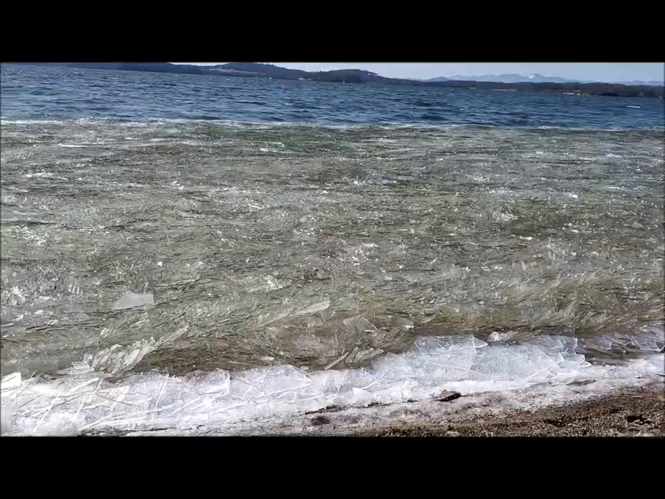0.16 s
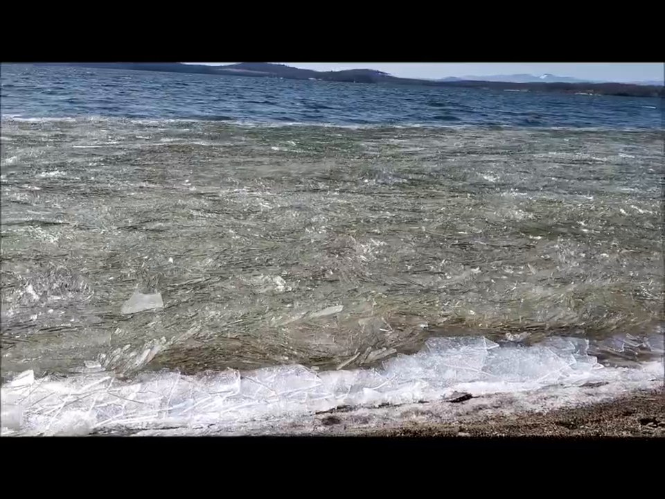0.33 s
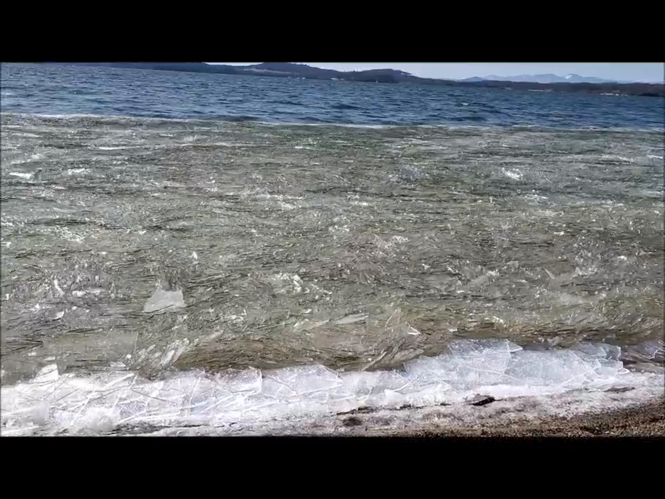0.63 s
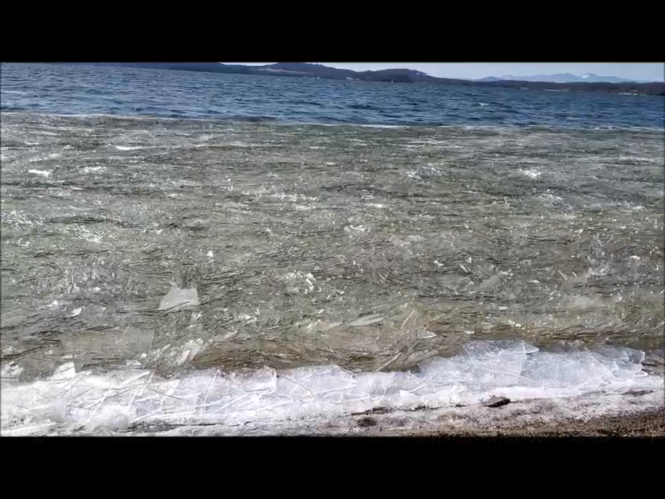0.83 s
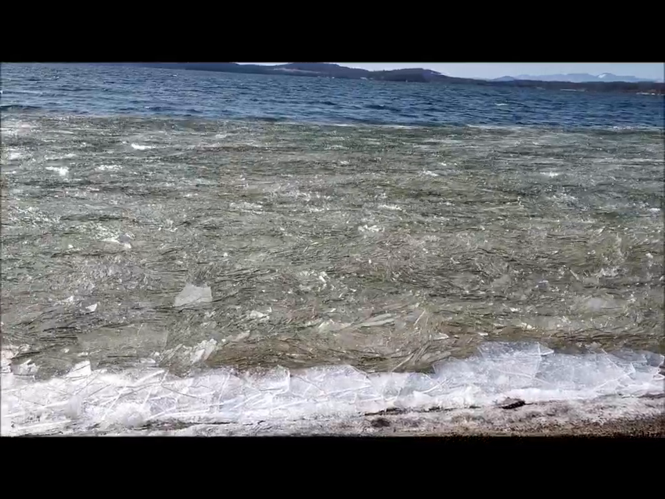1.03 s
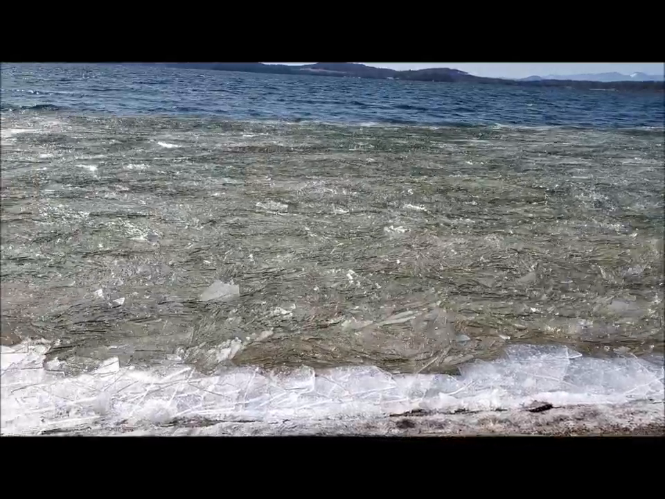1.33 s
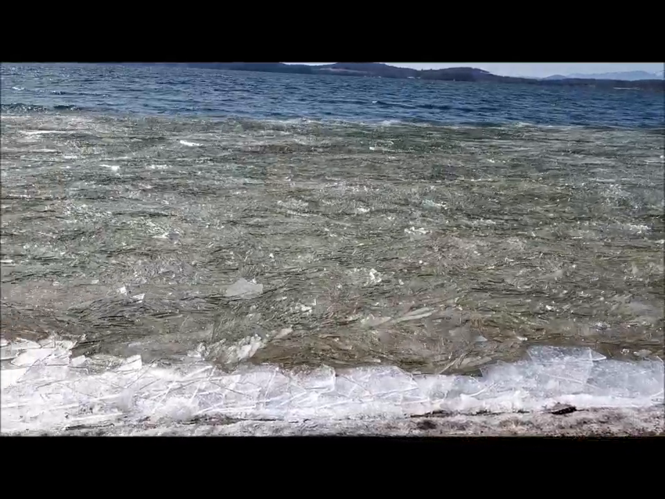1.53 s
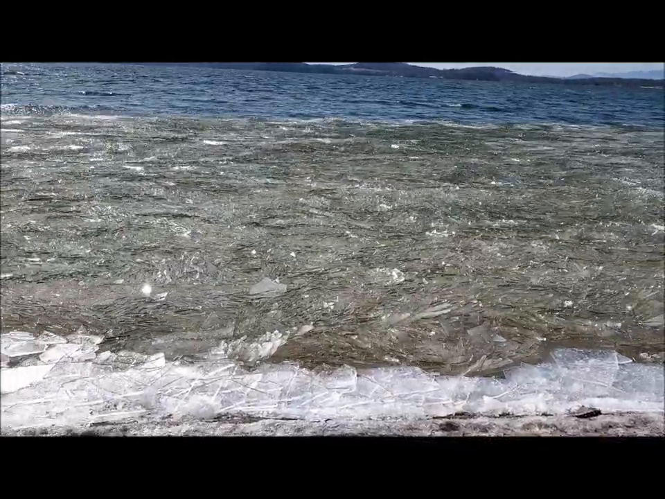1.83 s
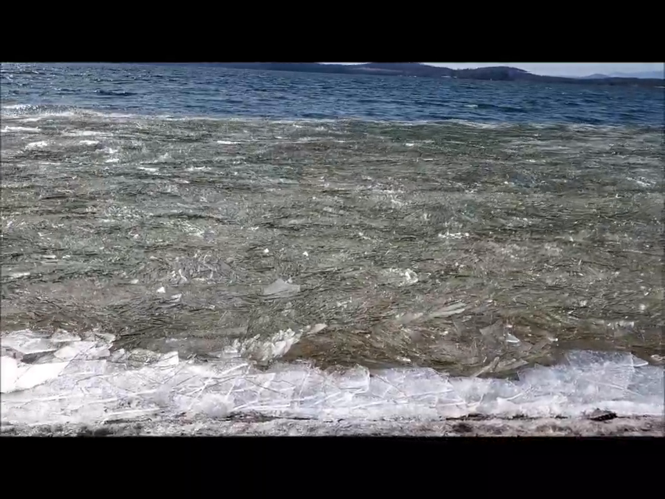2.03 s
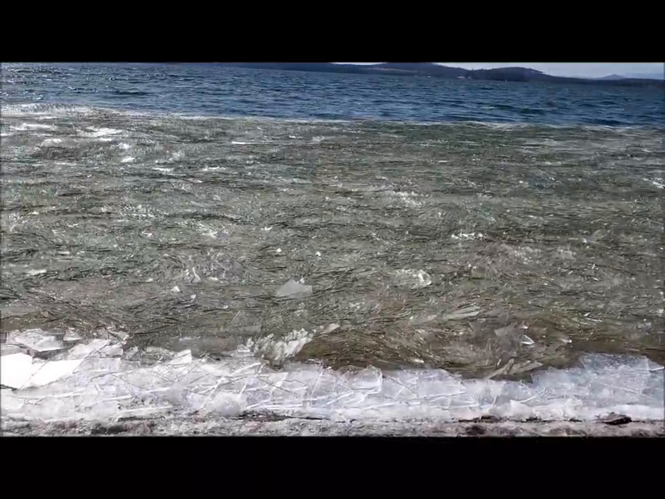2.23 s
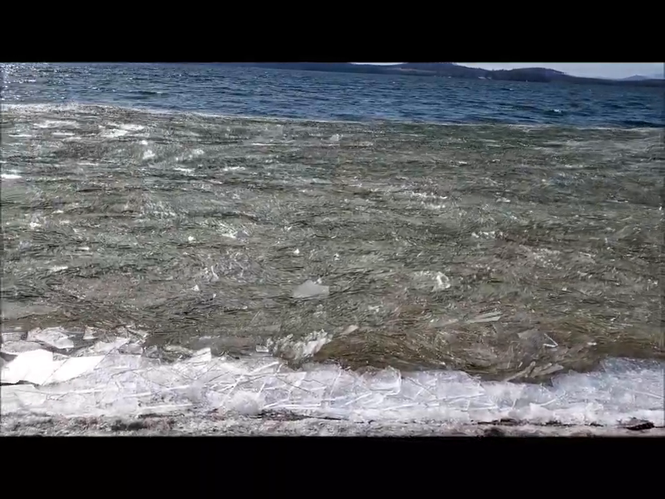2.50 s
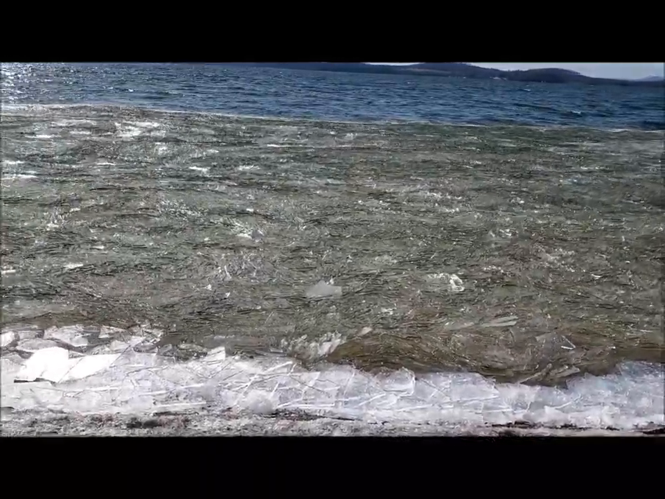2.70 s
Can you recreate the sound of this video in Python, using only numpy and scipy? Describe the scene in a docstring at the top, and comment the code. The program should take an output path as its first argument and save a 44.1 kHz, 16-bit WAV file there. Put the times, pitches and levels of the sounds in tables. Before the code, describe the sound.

Dense clinking and rattling of thin ice plates in small lake waves, with wash and light fizz; strong at first, dipping mid-way, then partly returning, as low wind thumps two spaced outdoor microphones.

```python
"""Small waves rock a field of thin broken ice plates along a lake shore, heard at two spaced microphones.
At first the water and ice are strong and busiest on the left; they sink after a second, then partly return
while the busy side moves to the right. Plates ring as short resonances, single knocks stand clear of them,
and water washes and fizzes as banded noise. Wind flutters low on each microphone, thumping from a third of
a second on: sparse clicks and noise coloured low, and brief bass swings at unequal levels on the two."""
import sys
import numpy as np
from scipy import signal
from scipy.fft import rfft, irfft
from scipy.io import wavfile
from scipy.ndimage import uniform_filter1d

SR = 44100
rng = np.random.default_rng(int(sys.argv[2]) if len(sys.argv) > 2 else 0)


def generate_wav(signal):
    """Clip the signal to [-1, 1] and save it as 16-bit WAV at the path in sys.argv[1]."""
    frames = np.transpose(np.atleast_2d(signal))
    scaled = np.clip(frames, -1, 1) * 32767
    pcm = np.round(scaled).astype(np.int16)
    wavfile.write(sys.argv[1], SR, pcm)


N = 126126

SPACING_S = 0.0004134   # sound's travel time from one microphone to the other
ALONG_SHORE = 0.8   # exponent; below 1, sources crowd toward the two ends of the shore

# relative colour shared by water and ice: pitch_hz [Hz], density_db [dB per Hz]
LAKE_COLOUR = [(200, -23), (300, -16), (420, -14), (560, -9), (900, -11), (1500, -10.5), (2350, -14.5),
               (2800, -20.5), (3600, -18), (4500, -25), (5600, -34.5), (7400, -38.5), (8100, -39),
               (9000, -32), (10500, -34), (12500, -36.5), (15700, -40)]


def clinking(levels, right):
    """Plates of all sizes touch at random, in clumps; each ring reaches the nearer microphone first."""
    clinks_per_s, size_spread_db, level_db = 1500, 0.5, -1.9   # level relative to the low surge
    clump_db, clumps_per_s = 2, 8.3   # wander of the clink rate
    rattle_db, rattles_per_s = 1.5, 11   # each plate pitch has its own busy spells
    ring_cycles, ring_law = 20.2, 0.37   # cycles per 60 dB of decay at 1 kHz; ring time falls as pitch^law
    shadow_db, tick_db = 1, -3.5   # far ear softer; dry crack of each touch against its ring
    margin = 32   # samples of room for the earlier arrivals

    rate = clinks_per_s * from_db(clump_db * drift(clumps_per_s))
    clicks = sparse(rate, size_spread_db, channels=1)[0]
    toward_end = np.sin(np.pi / 2 * rng.random(N)) ** ALONG_SHORE
    side = toward_end * np.where(rng.random(N) < right, 1, -1)   # -1 left to 1 right

    pitches = np.geomspace(330, 5200, 40)
    plate = rng.choice(40, N, p=pitches / pitches.sum())   # high pitches are struck more often
    rings, ticks = np.zeros((2, 2, N + 2 * margin))
    for k, hz in enumerate(pitches):
        at = np.nonzero(clicks * (plate == k))[0]
        delay = np.round(side[at] * SPACING_S * SR).astype(int)
        pair = np.full(rings.shape, 1e-18)
        pair[0, at + margin + delay] = clicks[at] * from_db(-shadow_db * side[at] / 2)
        pair[1, at + margin] = clicks[at] * from_db(shadow_db * side[at] / 2)
        ticks += pair

        # two equal resonators in a row soften the start of the ring
        decay_db_per_s = 60 * 1000 * (hz / 1000) ** ring_law / ring_cycles
        r = from_db(-decay_db_per_s / SR)
        turn = 2 * np.pi * hz / SR
        for _ in range(2):
            pair = signal.lfilter([1], [1, -2 * r * np.cos(turn), r * r], pair)
        swell = from_db(surge_db(hz, levels) + rattle_db * drift(rattles_per_s))
        rings[:, :N] += rms_one(pair[:, :N]) * np.sqrt(hz) * swell

    tick_gain = from_db(tick_db + levels[2] - levels[2].mean())
    both = rms_one(rings[:, :N]) + rms_one(ticks[:, :N]) * tick_gain
    return from_db(level_db + levels[0].mean()) * rms_one(colour(both, LAKE_COLOUR))


def knocks():
    """A plate is struck: a rough ring that holds for its length and dies fast in the water."""
    # clearest clinks: start_s [s], pitch_hz [Hz], level_db [dB, main mode before its envelope],
    # length_ms [ms to half amplitude], side [about -1 left to 1 right, by delay alone]
    strikes = [(0.008, 535, -38, 5.1, 0), (0.024, 580, -33.5, 33, -0.77), (0.03, 1712, -32.5, 12, -0.038),
               (0.037, 732, -26.5, 12.4, -1), (0.081, 552, -34.5, 13, -0.17), (0.082, 180, -33.5, 17, 0),
               (0.267, 1490, -29, 8.4, -0.92), (0.307, 690, -23.5, 2.4, -1.35), (0.469, 383, -33, 15, 0.71),
               (0.48, 3810, -35, 1.9, -0.47), (0.669, 910, -29.5, 6.5, 0), (0.688, 1635, -37, 15, 0),
               (0.708, 564, -32, 6, 0), (0.709, 1120, -32, 10.3, -0.16), (0.734, 4350, -35, 5.7, 0.55),
               (0.774, 2440, -29.5, 2.9, 0.0), (0.833, 507, -33.5, 12, -0.28), (0.915, 943, -34, 8.5, 0),
               (0.949, 2670, -20.5, 1.6, 1.07), (0.952, 1560, -32, 6.7, -1.06),
               (1.029, 3640, -29.5, 1.9, -0.65), (1.037, 2046, -25, 9.4, 0.82), (1.053, 777, -36, 7.9, 0),
               (1.051, 2190, -32, 5, 1.0), (1.374, 460, -34.5, 8.5, -0.9), (1.376, 780, -36, 4.9, -0.12),
               (1.472, 2200, -35, 7.2, 0.79), (1.598, 2400, -36, 5.6, 0.7), (1.964, 2360, -41, 20, -0.14),
               (2.002, 620, -30, 3.5, -0.84), (2.04, 2400, -35.5, 6.1, 1.02),
               (2.216, 870, -25.5, 5.7, -0.1), (2.218, 1396, -37, 5, -0.1), (2.312, 3230, -39.5, 5, -0.7),
               (2.325, 730, -33.5, 4.8, 0.2), (2.338, 2400, -35, 12, 1.02), (2.367, 1220, -38, 9.3, 0.66),
               (2.456, 2010, -36.5, 9.8, 0.94), (2.782, 1150, -34, 5.2, 1.13),
               (2.796, 2450, -38.5, 7, 1.03)]
    attack_s, roughness = 0.00065, 0.28
    partner_ratio, partner_db = 1.14, -12   # a weaker mode rings just above the main one

    out = np.zeros((2, N + SR))
    t = np.arange(SR // 10) / SR
    noises = rng.standard_normal((len(strikes), len(t)))
    for (start_s, hz, level_db, length_ms, side), noise in zip(strikes, noises):
        attack = 1 - np.exp(-(t / attack_s) ** 2)
        hold = np.exp(-np.log(2) * (1000 * t / length_ms) ** 3)
        around = signal.butter(3, [hz / 1.26, hz * 1.23], "band", fs=SR, output="sos")
        rough = rms_one(signal.sosfilt(around, noise))
        partner = from_db(partner_db) * np.sin(2 * np.pi * partner_ratio * hz * t)
        tone = np.sin(2 * np.pi * hz * t) + partner
        ring = attack * hold * (tone + roughness * rough)
        for channel, lag in enumerate([side, -side]):
            i = max(int((start_s + lag * SPACING_S / 2) * SR), 0)
            out[channel, i:i + len(t)] += from_db(level_db) * ring
    return out[:, :N]


def wash(levels, right):
    """Water noise in bands, each swelling with the surge and flickering in patches; the fizz is steadier."""
    level_db, fizz_db, fizz_from_hz = 0, 6.5, 5000   # level relative to the low surge; lift of the fizz
    shared_db, own_db, patches_per_s = 0.5, 1.42, 12.4   # flicker of all bands together and of each alone
    fizz_flicker = 0.67   # share of the flicker that the fizz keeps

    out, together = 0, drift(patches_per_s)
    edges = np.geomspace(120, 19000, 25)
    fields = [all_round(right, count=12), all_round(right, count=12)]   # neighbouring bands alternate
    for k, (low, high) in enumerate(zip(edges, edges[1:])):
        hz = np.sqrt(low * high)
        band_pass = signal.butter(2, [low, high], "band", fs=SR, output="sos")
        band = signal.sosfilt(band_pass, fields[k % 2])
        patch_db = shared_db * together + own_db * drift(patches_per_s)
        if hz >= fizz_from_hz:
            patch_db = patch_db * fizz_flicker
        lift_db = fizz_db * (hz > fizz_from_hz)
        out = out + band * from_db(surge_db(hz, levels) + patch_db + lift_db)
    return from_db(level_db + levels[0].mean()) * rms_one(colour(out, LAKE_COLOUR))


def wind():
    """Eddies flutter on each microphone separately; harder thumps push both at unequal levels."""
    # gust curve: time_s [s], level_db [dB before the trim], left_minus_right_db [dB]
    gusts = [(0.0, -27.5, 0), (0.04, -40, 0.5), (0.13, -39, 0), (0.21, -41.5, -19), (0.29, -41.5, 2),
             (0.33, -37.5, -5), (0.37, -45.5, -9), (0.44, -30.5, 0), (0.5, -43, -6), (0.64, -41, -2),
             (0.69, -44.5, 0.5), (0.92, -40.5, 0.5), (1.01, -50, 4), (1.11, -38, 5), (1.15, -45, 2),
             (1.2, -44, 5), (1.27, -38.5, -6), (1.31, -47.5, 4), (1.43, -50, 20), (1.47, -47, 6),
             (1.74, -39, -3.5), (1.87, -50.5, 0), (2.06, -34, 2), (2.2, -51, -2), (2.26, -42.5, 26),
             (2.35, -39.5, 2), (2.71, -36, 1), (2.74, -41, 16), (2.8, -35, -3), (2.86, -41.5, 5)]
    # relative colour of the buffeting: pitch_hz [Hz], density_db [dB per Hz]
    buffet = [(20, -29.5), (35, -19.5), (55, -11), (75, -11), (110, -15), (150, -21.5), (220, -27.5),
              (400, -35.5), (800, -90)]
    # hardest thumps: centre_s [s], peak_db [dB before panning], left_minus_right_db [dB]
    thumps = [(0.323, -30, 4), (0.441, -39, -2), (0.642, -31.5, -11), (0.9, -33.5, 15), (1.11, -35, -4),
              (1.631, -32, 0), (2.052, -28, -5), (2.121, -28, -5), (2.5, -37, 1), (2.6, -29, -2),
              (2.718, -43, 22), (2.81, -26, 22)]
    trim_db, eddies_per_s, eddy_spread_db, eddy_share = -0.4, 64, 2.5, 0.58   # the rest is steady noise
    lull_db, lulls_per_s = 2.5, 14   # wander of the level at each microphone
    thump_hz, thump_s = 67.3, 0.0089   # each thump swings about twice

    gust_db, gust_pan_db = in_time(gusts)
    eddies = rms_one(sparse(eddies_per_s, eddy_spread_db, channels=2))
    air = eddy_share * eddies + (1 - eddy_share) * rng.standard_normal((2, N))
    lulls = from_db(lull_db * np.array([drift(lulls_per_s), drift(lulls_per_s)]))
    flutter = rms_one(colour(air, buffet) * lulls)

    centre_s, peak_db, thump_pan_db = np.transpose(thumps)
    at = np.minimum((centre_s * SR).astype(int), N - 1)
    hits = np.zeros((2, N))
    hits[:, at] = from_db(peak_db) * panned(thump_pan_db) * rng.choice([-1, 1], len(at))
    t = np.arange(-SR // 20, SR // 20) / SR
    push = np.exp(-(t / thump_s) ** 2) * np.cos(2 * np.pi * thump_hz * t)
    thumping = signal.fftconvolve(hits, push[None], "same")
    return from_db(gust_db + trim_db) * panned(gust_pan_db) * flutter + thumping


def all_round(right, count):
    """White noise from bearings all round the horizon, each with its own delay between the microphones."""
    angles = np.pi * ((np.arange(count) + rng.random(count)) / count - .5)
    ways = np.sin(angles)
    lags = SPACING_S * np.sign(ways) * np.abs(ways) ** ALONG_SHORE
    turn = 2j * np.pi * np.fft.rfftfreq(N, 1 / SR)
    waves = rfft(rng.standard_normal((count, N)))
    pairs = np.array([waves * np.exp(-turn * lags[:, None]), waves])
    # sound from the right reaches the left microphone late
    from_left = irfft(pairs[:, lags < 0].sum(1), N)
    from_right = irfft(pairs[:, lags > 0].sum(1), N)
    return np.sqrt(1 - right) * from_left + np.sqrt(right) * from_right


def surge_db(hz, levels):
    """Level curve at a pitch: a blend of the low, middle and treble curves about their means."""
    # centres of the low, middle and treble curves: pitch_hz [Hz]
    centres_hz = [700, 2500, 9000]
    place = np.interp(np.log(hz), np.log(centres_hz), np.arange(3))
    return sum(max(1 - abs(place - k), 0) * (db - db.mean()) for k, db in enumerate(levels))


def sparse(per_s, spread_db, channels):
    """Random clicks of random sign; a few are larger than the rest."""
    excess = np.minimum(rng.exponential(1, (channels, N)), 3.0)
    sizes = from_db(spread_db * excess) * rng.choice([-1, 1], (channels, N))
    return sizes * (rng.random((channels, N)) < per_s / SR)


def drift(rate):
    """Random wander of spread 1: low-passed noise without its slowest part; rate is in Hz."""
    step = 40   # samples between drawn points
    r = np.exp(-2 * np.pi * rate * step / SR)
    noise = rng.standard_normal(N // step + 2002)
    slow = signal.lfilter([1], [1, -2 * r, r * r], noise)[2000:]   # drop the filter's run-in
    slow = slow - uniform_filter1d(slow, size=170)
    return np.interp(np.arange(N) / step, np.arange(len(slow)), rms_one(slow))


def colour(x, points):
    """Give a sound the spectrum of a table."""
    hz = np.fft.rfftfreq(x.shape[-1], 1 / SR) + 1   # keeps the logarithm finite at 0 Hz
    return irfft(rfft(x) * from_db(at_hz(points, hz)), x.shape[-1])


def panned(db):
    """Left and right gains for a level difference, power kept."""
    left = 1 / (1 + from_db(-2 * db))
    return np.sqrt([2 * left, 2 - 2 * left])


def from_db(db):
    """Amplitude gain of a level in dB."""
    return 10 ** (np.asarray(db) / 20)


def rms_one(x):
    """Scale a signal to an RMS of one over all its channels."""
    return x / np.sqrt(np.mean(x ** 2) + 1e-20)


def in_time(rows):
    """Draw each column of a timed table as a curve at the sample rate."""
    s, *columns = np.transpose(rows)
    return [np.interp(np.arange(N) / SR, s, c) for c in columns]


def at_hz(points, hz):
    """Read a spectrum table at any pitch, on a logarithmic pitch scale."""
    table_hz, table_db = np.transpose(points)
    return np.interp(np.log(hz), np.log(table_hz), table_db)


def scene():
    """Ice, water and wind at the two microphones."""
    # surge of water and ice: time_s [s], low_db, middle_db, treble_db [dB];
    # the low mean sets the level, and each curve acts about its own mean
    surge = [(0.0, -29, -39.5, -46), (0.03, -36, -37, -47.5), (0.12, -37, -43, -49),
             (0.93, -33.5, -40.5, -50), (1.02, -36, -44.5, -49.5), (1.07, -36.5, -43, -51),
             (1.25, -43, -49, -52.5), (1.39, -43, -48.5, -52), (1.45, -47, -51, -54),
             (1.51, -41.5, -46, -50.5), (2.02, -40, -43.5, -50.5), (2.2, -39, -43, -49.5),
             (2.25, -44, -48.5, -53), (2.3, -37, -42.5, -52), (2.4, -39, -44.5, -51),
             (2.86, -41, -44.5, -52)]
    # where the surf is busiest: time_s [s], right_share [0-1]
    bearing = [(0, 0.31), (1.0, 0.35), (1.4, .75), (2.86, 0.91)]
    levels = in_time(surge)
    right = in_time(bearing)[0]
    return clinking(levels, right) + knocks() + wash(levels, right) + wind()


def record(dry):
    """The top is cut steeply by an elliptic low-pass."""
    cutoff_hz, ripple_db, stop_db = 15750, .3, 55
    low_pass = signal.ellip(11, ripple_db, stop_db, cutoff_hz, fs=SR, output="sos")
    return signal.sosfilt(low_pass, dry)


dry = scene()
out = record(dry)
generate_wav(out)
```